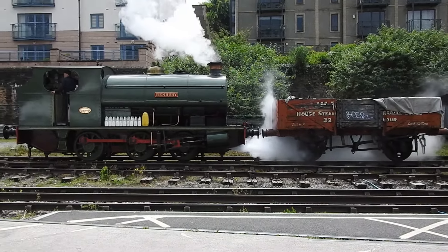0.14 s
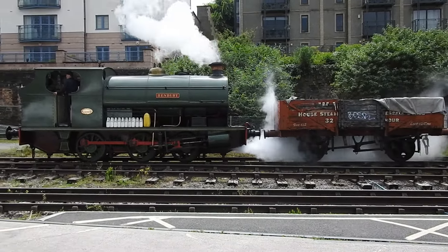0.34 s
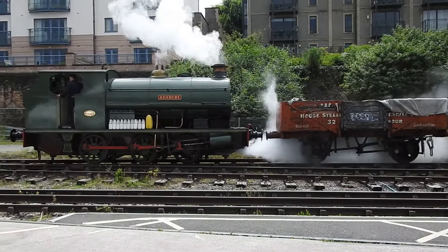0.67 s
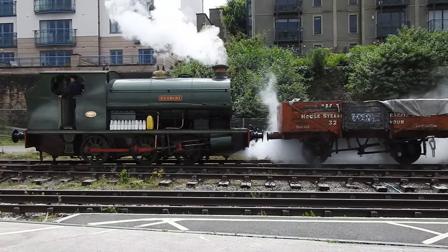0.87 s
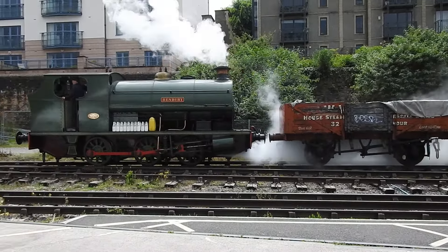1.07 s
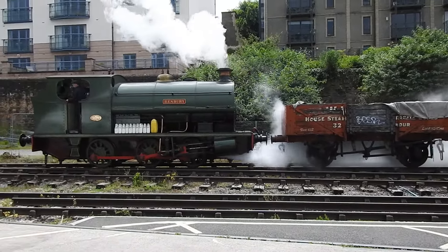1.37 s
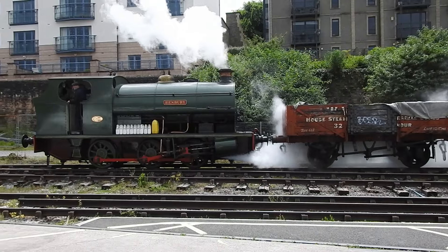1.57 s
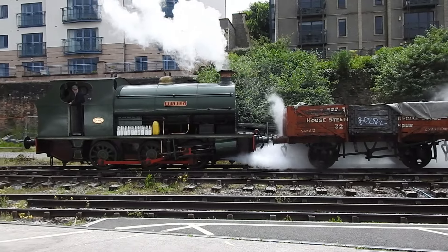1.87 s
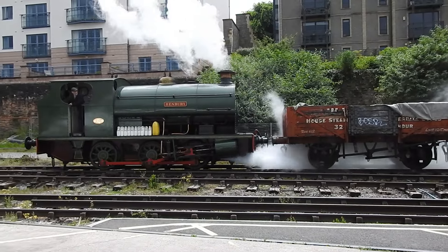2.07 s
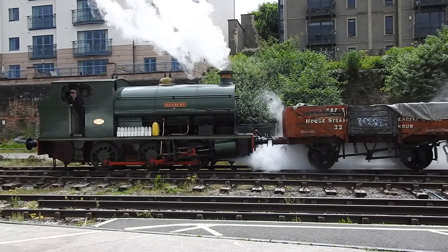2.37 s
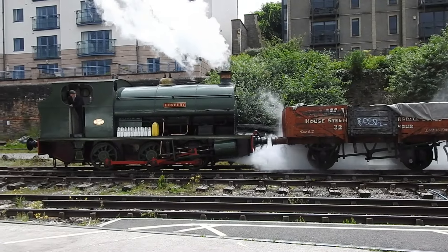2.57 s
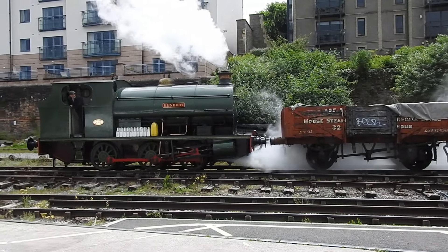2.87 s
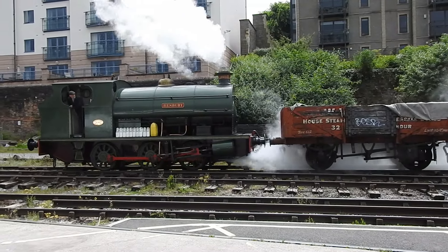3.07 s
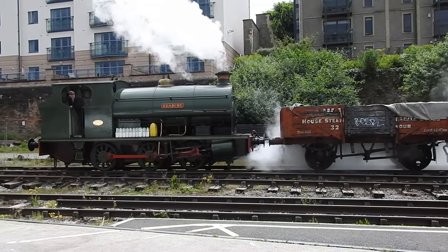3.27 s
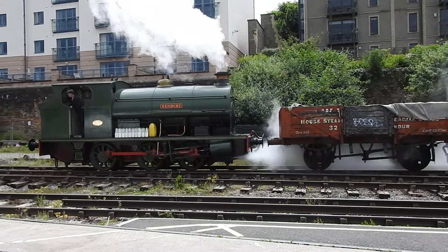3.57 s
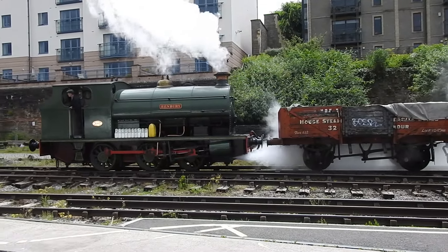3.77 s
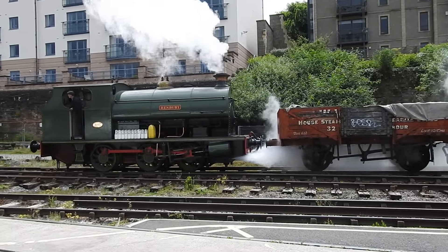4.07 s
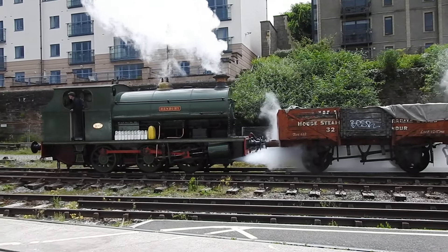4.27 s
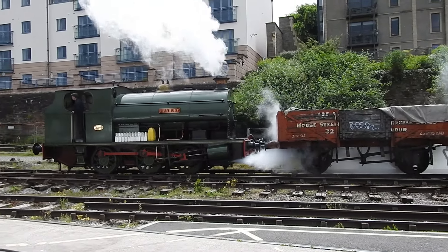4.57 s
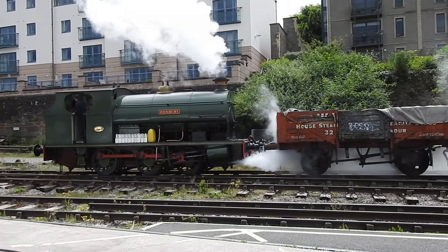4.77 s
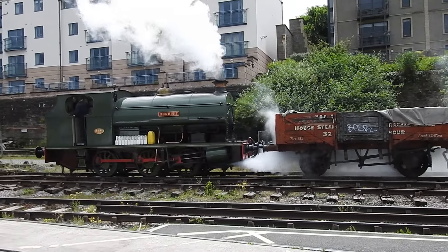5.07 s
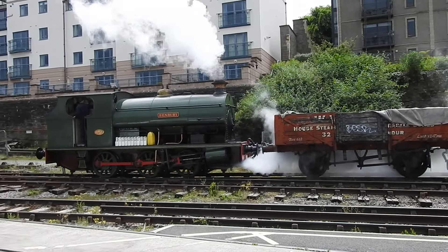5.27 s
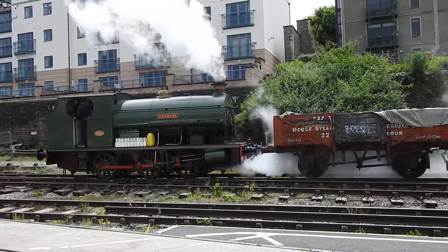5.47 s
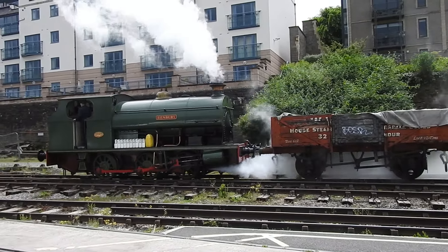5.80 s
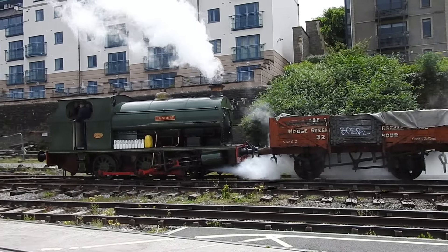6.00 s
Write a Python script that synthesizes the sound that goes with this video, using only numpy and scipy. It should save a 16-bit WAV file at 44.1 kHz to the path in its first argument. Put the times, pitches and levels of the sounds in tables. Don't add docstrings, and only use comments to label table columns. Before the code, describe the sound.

About six seconds of a small steam engine creeping with wagons through an outdoor yard, heard from some twenty metres on a compact, narrow stereo microphone. A loud, bright steam hiss runs throughout, barely wavering, dipping slightly near 2.4 s; coarser mid-pitched jets roughen it. At 0-0.3 s a quick cluster of low wagon thuds with a dull clank and the strongest rumble, then lighter bumps at 0.7-0.8. Soft, hollow exhaust puffs swell around 1.1, 1.4, 1.9, 2.25 and 2.8 s, briefly at 3.4, and again from 5.3. A stuttering run of coupling knocks comes at 1.7-1.85; single thuds at 3.0 and 3.2, clanking knocks at 3.6 and 3.97, the latter ringing brightest. A faint low plate ring at 4.35, a thud at 4.8, then clustered knocks at 5.5-5.65 and a hard, heavy knock at 5.82, followed by a tiny high ting. Low, lumpy wheel rumble continues beneath to the abrupt end.

```python
import sys
import numpy as np
from scipy import signal
from scipy.fft import rfft, irfft, next_fast_len
from scipy.io import wavfile
from scipy.ndimage import map_coordinates

SR = 44100
rng = np.random.default_rng(int(sys.argv[2]) if len(sys.argv) > 2 else 0)


def persist_wave(psi):
    counts = np.round(np.clip(psi, -1, 1) * 32767).astype(np.int16)
    wavfile.write(sys.argv[1], SR, np.atleast_2d(counts).T)


def gain_from_decibels(decibels):
    exponent = np.asarray(decibels, float) / 20
    return 10 ** exponent


N = 270774
T = np.arange(N) / SR
SIZE = next_fast_len(N + 8192)
HZ = np.arange(SIZE // 2 + 1) * SR / SIZE + 1

# t/s, level/dB
VALVE_PRESSURE = [(0, -13.5), (.7, -14), (1.35, -14.5), (1.8, -14.5), (2.25, -14), (2.42, -16),
                  (2.52, -14.5), (2.75, -15.5), (3.3, -14.3), (4.2, -13.5), (5.0, -14), (5.4, -14),
                  (5.7, -14.3), (6.14, -14)]
# f/Hz, density/dB
VALVE_COLOUR = [(2760, -25), (4700, -6.5), (5070, -5), (5770, 1.5), (6500, 0.5), (8100, -6.5),
                (8560, -11.5), (9320, -10.5), (10100, -20.5), (11500, -21.5), (12300, -32.5),
                (13100, -29.5), (15500, -36)]
# f/Hz, density/dB
COCK_COLOUR = [(380, -63), (650, -16), (957, -10), (1030, -9.5), (1150, -11.5), (1630, -5.5), (2040, -6.5),
               (2260, -5), (3000, -3), (3330, 2), (3860, -5), (4260, -1), (5300, -4), (6890, -9),
               (11700, -120)]
# f/Hz, width/Hz, level/dB
BLAST_PIPE = [(1040, 430, 4.5), (1597, 167, 0), (820, 430, -2.5), (1806, 150, -18), (2106, 470, -8.5),
              (609, 124, -3.5)]
# start/s, length/s, level/dB, upper modes over lower/dB
PUFFS = [(0, 0.12, -33.5, 6), (1.098, 0.38, -26, 3), (1.404, 0.29, -27.5, 6.5), (1.906, 0.44, -31.5, 5),
         (2.25, 0.52, -28.5, 5.5), (2.767, 0.39, -29.5, 5.5), (3.438, 0.14, -31, 5.5),
         (5.297, 0.037, -30, 1), (5.55, 0.16, -27, 2), (5.654, .09, -28, 4.5), (5.95, 0.098, -28.5, 6)]
# t/s, body level/dB
WHEEL_LOAD = [(0, -22.5), (.27, -32.5), (.5, -31.5), (.77, -26.5), (1.14, -30), (1.5, -29), (2.0, -30),
              (2.27, -30.5), (2.55, -28.5), (3.56, -29), (4.0, -32), (4.45, -37), (5.13, -29), (5.54, -28),
              (6.14, -28.5)]
# f/Hz, density/dB
ROLL_COLOUR = [(13, -45), (22, -23), (70, -5), (129, -5.5), (182, 2), (226, 1.5), (339, -5.5), (588, -9),
               (700, -3.5), (910, -32), (1540, -120)]
# t/s, peak/dB, body f/Hz
THUDS = [(0.008, -13.5, 135), (0.054, -18, 170), (0.08, -14, 144), (0.106, -15, 146), (0.303, -16, 170),
         (0.703, -24, 183), (0.776, -18, 200), (0.899, -47, 171), (1.700, -15, 221), (1.714, -8, 266),
         (1.732, -9, 263), (1.755, -18, 198), (1.781, -18, 191), (1.808, -15, 172), (1.856, -15, 183),
         (2.986, -8.5, 218), (3.01, -23, 170), (3.036, -25, 211), (3.224, -12, 181), (3.613, -13, 235),
         (3.967, -15, 250), (4.804, -11, 195), (5.501, -15, 260), (5.519, -10, 173), (5.579, -14, 191),
         (5.641, -13, 211), (5.66, -26, 232), (5.818, -12, 234), (5.86, -9, 243), (5.886, -13, 217)]
# t/s, peak/dB, ring over crack/dB, crack f/Hz
CLANKS = [
    (.015, -32, 7, 800),
    (1.737, -25, -27, 800),
    (3.597, -23, -3, 2100),
    (3.612, -24, -20, 700),
    (3.9668, -19, 0, 1700),
    (3.973, -26.5, 9, 890),
    (4.011, -27, -2, 800),
    (5.818, -12, -22, 520),
]
# f/Hz, level/dB, t60/s
ROD_MODES = [(812, 4, 0.082), (854, -4, .08), (1370, -1, 0.082), (1700, -9, 0.044), (2130, -21, 0.059),
             (2530, -6, 0.058), (392, 0, 0.051), (1150, 0.5, 0.035)]
# t/s, peak/dB, f/Hz, t60/s
PLATES = [
    (3.24, -29, 412, .14),
    (3.222, -25, 310, .06),
    (4.355, -27, 410, 0.2),
    (5.32, -28, 395, 0.14),
    (5.972, -27, 2165, .1),
    (5.819, -14, 737, 0.04),
    (5.818, -20, 1028, .04),
    (5.82, -20, 390, 0.05),
]
# f/Hz, likeness/0-1
PORT_LIKENESS = [(40, .96), (130, 1), (700, .98), (1200, 1), (2000, 0.88), (3100, 1), (4400, 0.89),
                 (5800, 0.92), (6800, 0.82), (8700, 0.86), (10200, 0.95), (12500, 0.92), (14100, 0.2),
                 (15000, .97)]
# f/Hz, left minus right/dB
PORT_BALANCE = [(30, -1.5), (125, 0), (800, 0), (1300, -3), (2600, -.3), (4000, -1.5), (5500, 0),
                (6200, -.7), (7000, -4), (8500, -5), (9600, -.3), (13000, 0), (14200, -2), (15000, 0)]
# f/Hz, left lead/rad
PORT_LEAD = [(30, 0), (800, 0), (1200, -.1), (2200, .12), (3600, -.1), (4350, .14), (5000, 0), (5300, -.33),
             (6700, -.58), (7300, -.07), (7800, -.25), (8400, -.12), (8900, .36), (10000, 0)]
# f/Hz, width/Hz, depth/0-1
SOUND_DIPS = [(1345, 110, 0.3), (3995, 90, 0.6), (4530, 230, 0.5), (5170, 330, 0.4), (12330, 450, .38),
              (14150, 600, .4)]

VALVE_TOP_DB_PER_DB = 1.4
COCKS_DB, COCKS_DB_PER_DB = -22, -0.4
PUFF_ATTACK_S, PUFF_RELEASE_S = 0.045, 0.1
LEAK_DB, LEAK_UPPER_DB = -43, 9
SHAKE_DB, SHAKE_S = -16.5, 0.045
THUD_T60_S, THUD_HZ, THUD_SLOPE = 0.095, 201, 0.3
DEEP_DB, DEEP_DB_PER_DB = -7, 0.4
PLANK_DB, PLANK_DB_PER_DB = -10, 1.53


def read(table):
    s, *columns = np.transpose(table)
    return [np.interp(T, s, c) for c in columns]


def along(table, hz=HZ):
    f, v = np.transpose(table)
    return np.interp(np.log(hz), np.log(np.maximum(f, 1)), v)


def shape(x, response):
    return irfft(rfft(x, SIZE) * response, SIZE)[..., :N]


def peak(hz, width):
    return 1 / (1 + 1j * (HZ ** 2 - hz ** 2) / (HZ * width))


def unit(x, lo_hz, hi_hz):
    return x / np.std(shape(x[0], (HZ > lo_hz) & (HZ < hi_hz)))


def swell(start, length, attack, release):
    rise = np.clip((T - start) / attack, 0, 1)
    return rise * np.exp(-np.maximum(T - start - length, 0) / release)


def turbulence(rate, shared_db, own_db, count=40):
    hz, s, z = signal.stft(rng.standard_normal((2, N)), SR, nperseg=512)
    chance = rng.standard_normal((count + 1, 400))
    db = shared_db * chance[0] + own_db * chance[1:]
    rows = count * np.sqrt(hz / hz[-1])
    places = np.meshgrid(rows, s * min(rate, 60), indexing="ij")
    field = map_coordinates(db, places, order=1, mode="nearest")
    return signal.istft(z * gain_from_decibels(field), SR)[1][:, :N]


def strike(out, s, db, hz, t60, rise=0.002):
    start = int(s * SR)
    t = T[:min(SR // 2, N - start)]
    envelope = (1 - np.exp(-t / rise)) * np.exp(-np.log(1000) * t / t60)
    out[start:start + len(t)] += gain_from_decibels(db) * envelope * np.sin(2 * np.pi * hz * t)


def safety_valve(pressure_db, swing_db):
    mouth = 1 + 0.47 * peak(6300, 330)
    gas = turbulence(rate=21, shared_db=0.2, own_db=0.66, count=9)
    jet = unit(shape(gas, gain_from_decibels(along(VALVE_COLOUR)) * mouth), 5200, 7750)
    top = shape(jet, 1 / (1 + (8200 / HZ) ** 12))
    return gain_from_decibels(pressure_db) * (jet + (gain_from_decibels(VALVE_TOP_DB_PER_DB * swing_db) - 1) * top)


def drain_cocks(swing_db):
    gas = turbulence(rate=26, shared_db=0.67, own_db=0.9)
    jet = unit(shape(gas, gain_from_decibels(along(COCK_COLOUR))), 2370, 4710)
    return gain_from_decibels(COCKS_DB + COCKS_DB_PER_DB * swing_db) * jet


def steam_jets():
    pressure_db, = read(VALVE_PRESSURE)
    swing_db = pressure_db - np.mean(pressure_db)
    return safety_valve(pressure_db, swing_db) + drain_cocks(swing_db)


def exhaust():
    gas = turbulence(rate=30, shared_db=0.83, own_db=0.74)
    lower = shape(gas, sum(gain_from_decibels(db) * peak(f, w) ** 2 for f, w, db in BLAST_PIPE if f < 1300))
    upper = shape(gas, sum(gain_from_decibels(db) * peak(f, w) ** 2 for f, w, db in BLAST_PIPE if f > 1300))
    lower_gain = gain_from_decibels(LEAK_DB)
    upper_gain = gain_from_decibels(LEAK_DB + LEAK_UPPER_DB)
    for start, length, db, upper_db in PUFFS:
        puff = gain_from_decibels(db) * swell(start, length, PUFF_ATTACK_S, PUFF_RELEASE_S)
        lower_gain = np.maximum(lower_gain, puff)
        upper_gain = np.maximum(upper_gain, gain_from_decibels(upper_db) * puff)
    lower = lower_gain * unit(lower, lo_hz=770, hi_hz=1880)
    upper = gain_from_decibels(-4) * upper_gain * unit(upper, lo_hz=1500, hi_hz=1730)
    return lower + upper


def rolling():
    load_db, = read(WHEEL_LOAD)
    shake = sum(gain_from_decibels(db + SHAKE_DB) ** 2 * swell(s, 0, 0.0099, SHAKE_S) for s, db, hz in THUDS)
    level = np.sqrt(gain_from_decibels(load_db) ** 2 + shake)
    mean = np.mean(level)

    gas = turbulence(rate=25, shared_db=1.7, own_db=1.4)
    rumble = shape(gas, gain_from_decibels(along(ROLL_COLOUR)))
    deep = shape(rumble, 1 / (1 + (HZ / 112) ** 6))
    planks = shape(rumble, 1 / (1 + (340 / HZ) ** 8))
    notches = unit(rumble - deep - planks, 120, 390)

    deep_gain = gain_from_decibels(DEEP_DB) * mean * (level / mean) ** DEEP_DB_PER_DB
    plank_gain = gain_from_decibels(PLANK_DB) * mean * (level / mean) ** PLANK_DB_PER_DB
    return (gain_from_decibels(-4.0) * level * notches + deep_gain * unit(deep, 40, 140)
            + plank_gain * unit(planks, 250, 880))


def coupling_thuds():
    out = np.zeros(N)
    for s, db, hz in THUDS:
        t60 = THUD_T60_S * (THUD_HZ / hz) ** THUD_SLOPE
        strike(out, s, db - 1.5, hz, t60, rise=0.005)
        strike(out, s, db - 9, hz * 0.78, t60 * 1.2, rise=0.006)
    return out


def rod_clanks():
    out, grit = np.zeros(N), rng.standard_normal(N)
    for s, db, ring_db, hz in CLANKS:
        burst = grit * (T >= s) * np.exp(-np.maximum(T - s, 0) / 0.0098)
        out += gain_from_decibels(db + 16.5) * shape(burst, peak(hz, 1.67 * hz) ** 2)
        for f, mode_db, t60 in ROD_MODES:
            strike(out, s, db + ring_db + mode_db, f, t60, rise=0.00052)
    return out


def plate_rings():
    out = np.zeros(N)
    for s, db, hz, t60 in PLATES:
        strike(out, s, db, hz, t60, rise=0.004)
    return out


def knocks():
    hits = coupling_thuds() + rod_clanks() + plate_rings()
    t = T[:SR // 2]
    tail = rng.standard_normal((2, SR // 2)) * np.exp(-np.log(1000) * t / 0.39)
    wet = gain_from_decibels(-38) * signal.fftconvolve(hits[None], tail, axes=1)[:, :N]
    return wet + hits * np.array([[1], [0]])


def scene():
    direct, scattered = steam_jets() + exhaust() + rolling() + knocks()
    like = np.clip(along(PORT_LIKENESS), 0, 1)
    mid = shape(direct, np.sqrt((1 + like) / 2))
    side = shape(scattered, np.sqrt((1 - like) / 2))
    return np.array([mid + side, mid - side])


def top_cut(x):
    return signal.sosfilt(signal.butter(12, 15660, fs=SR, output="sos"), x)


def record(dry):
    half = gain_from_decibels(along(PORT_BALANCE) / 2) * np.exp(0.5j * along(PORT_LEAD))
    dips = [1 - np.clip(depth, 0, 1) * peak(hz, width) for hz, width, depth in SOUND_DIPS]
    notches = np.prod(dips, axis=0)
    bass_cut = 1 / (1 + (42 / HZ) ** 4)
    ports = gain_from_decibels(0.5) * shape(dry, notches * bass_cut * np.array([half, 1 / half]))
    return top_cut(np.clip(ports, -1, 1))


dry = scene()
out = record(dry)
persist_wave(out)
```